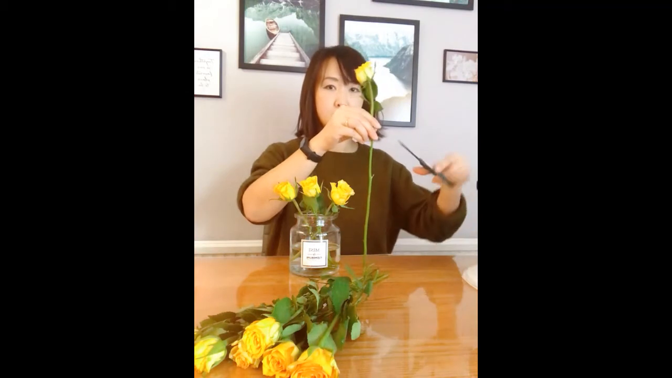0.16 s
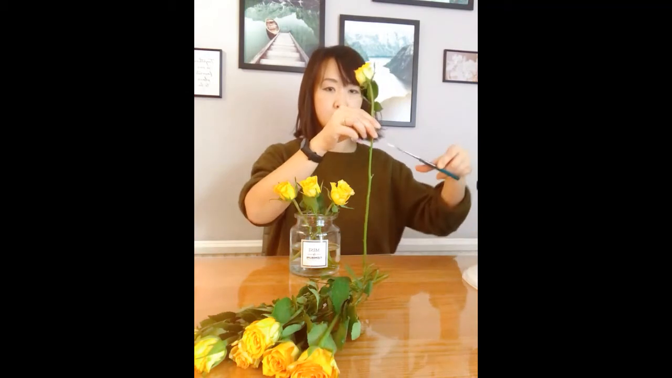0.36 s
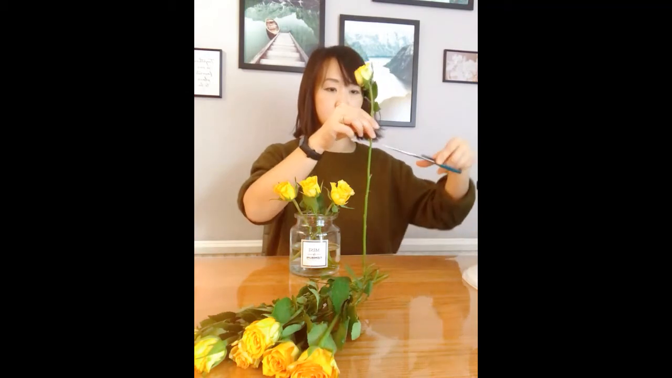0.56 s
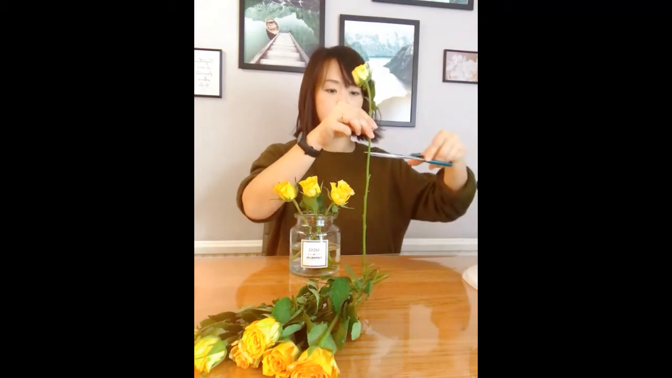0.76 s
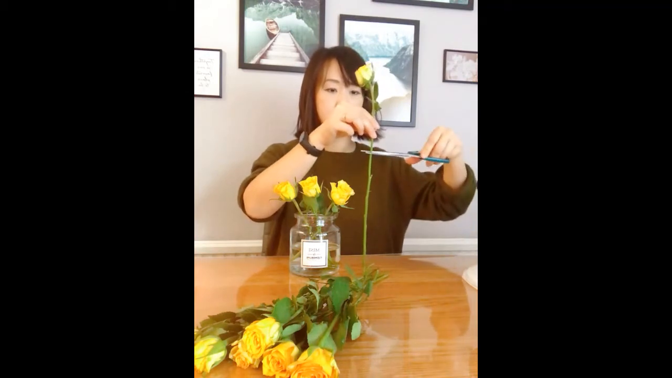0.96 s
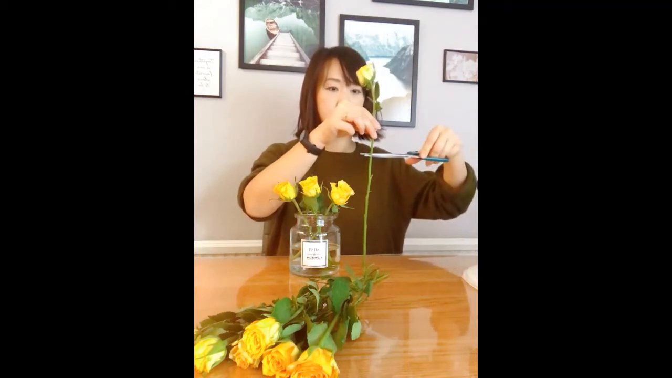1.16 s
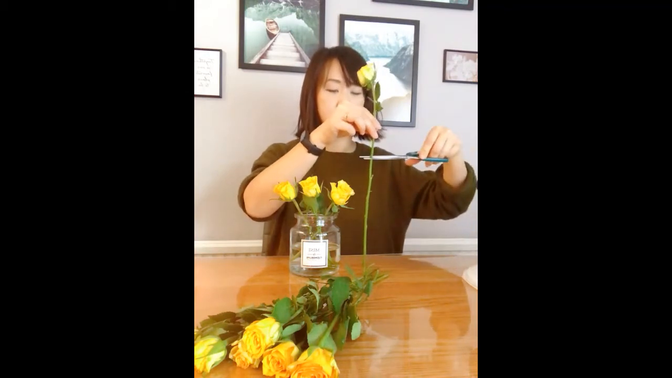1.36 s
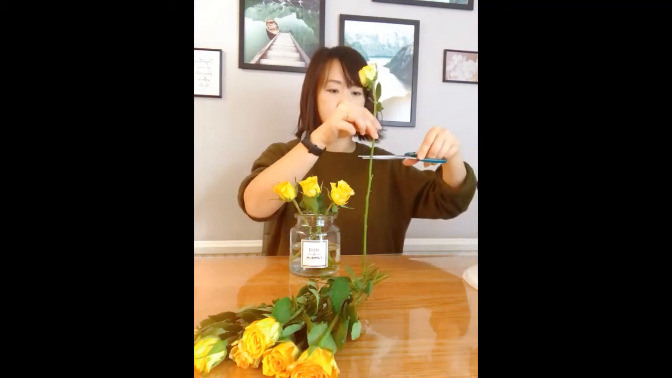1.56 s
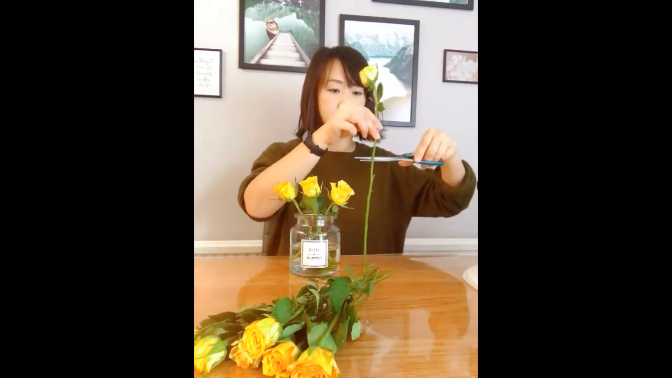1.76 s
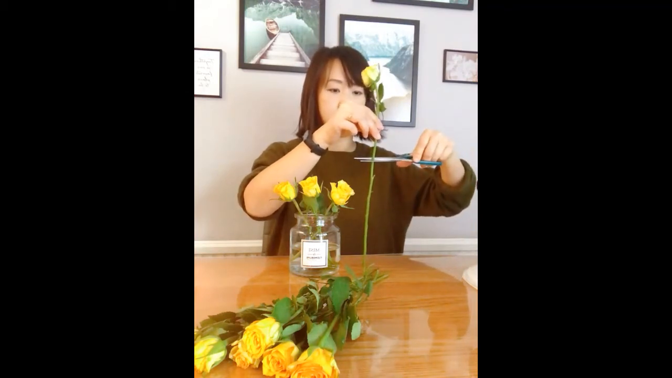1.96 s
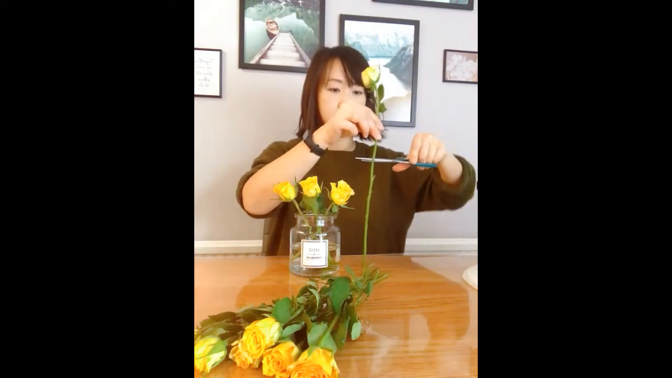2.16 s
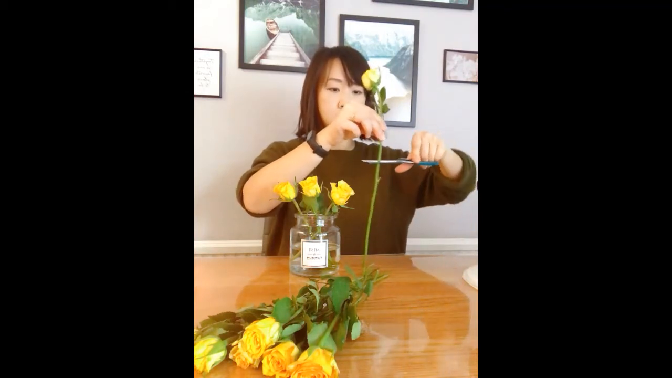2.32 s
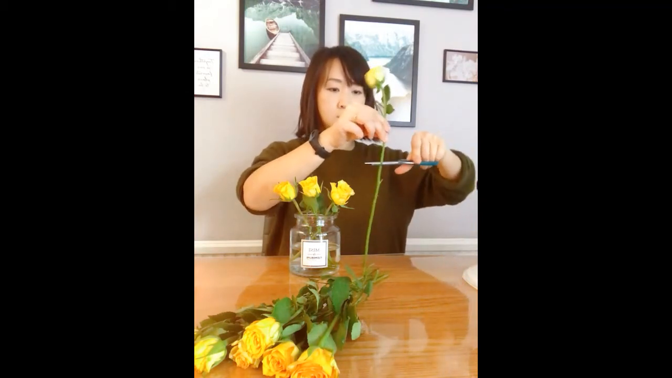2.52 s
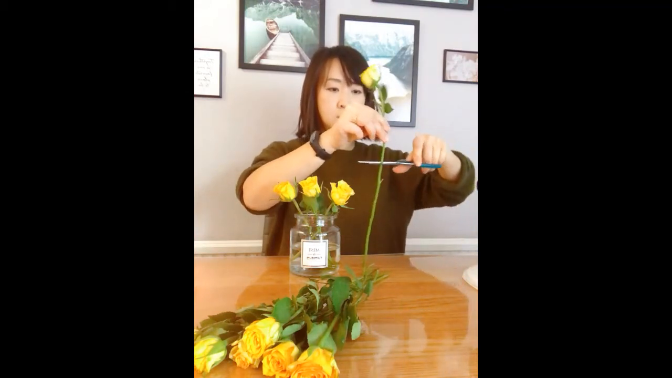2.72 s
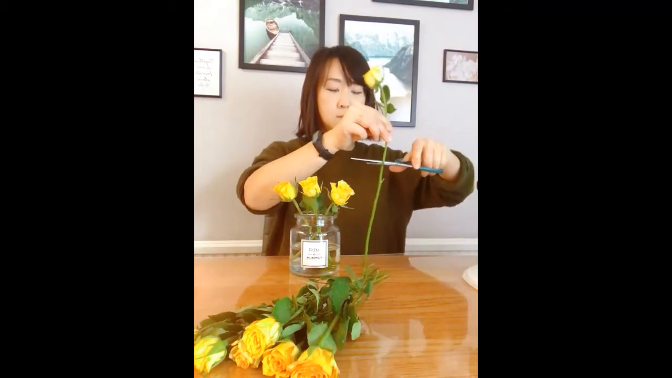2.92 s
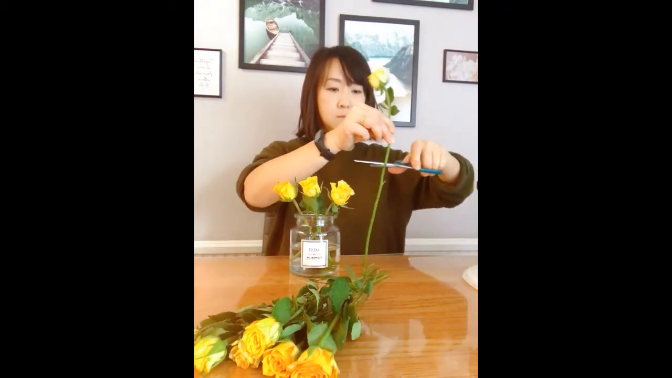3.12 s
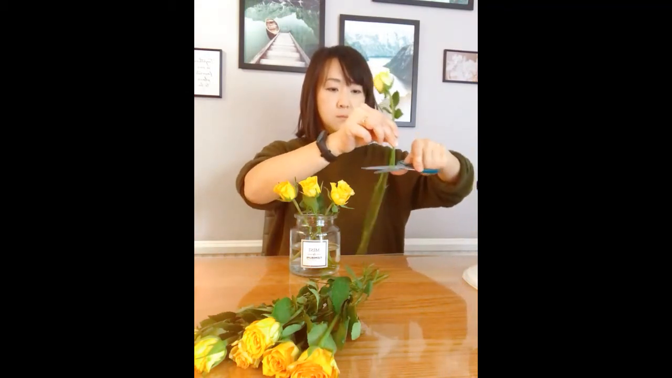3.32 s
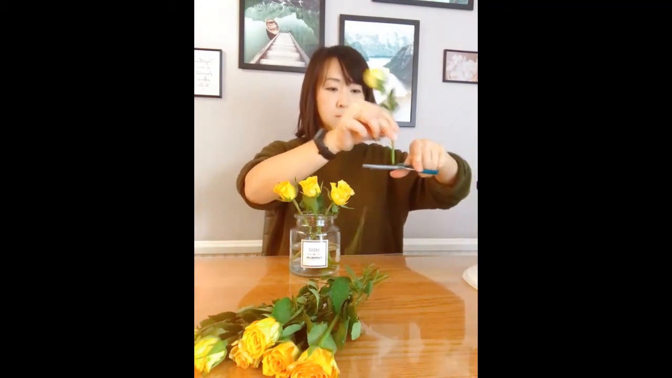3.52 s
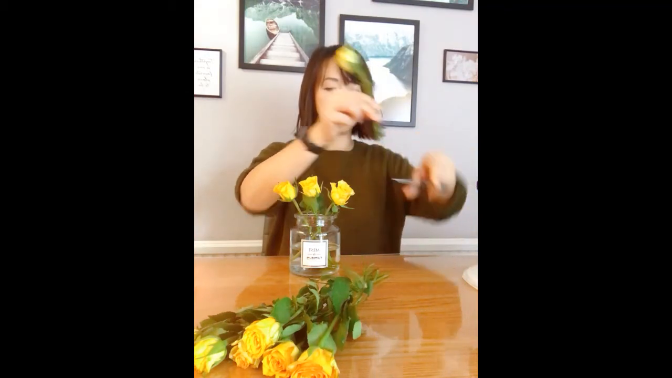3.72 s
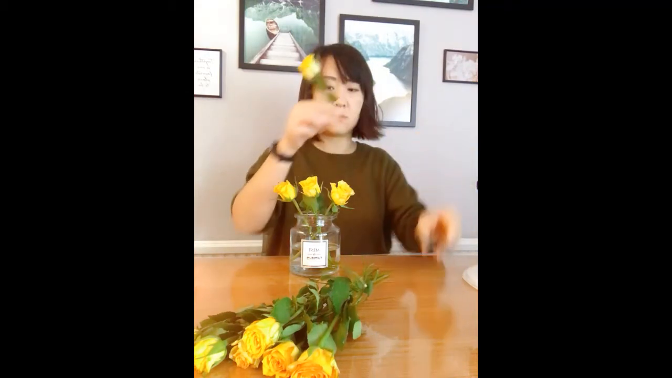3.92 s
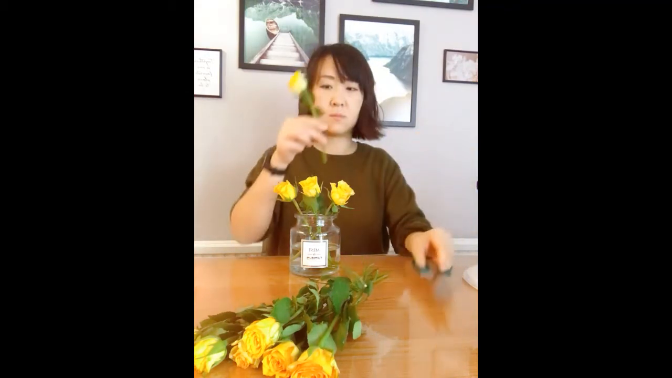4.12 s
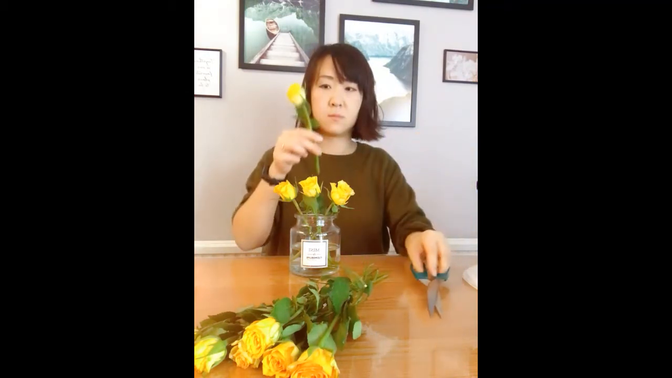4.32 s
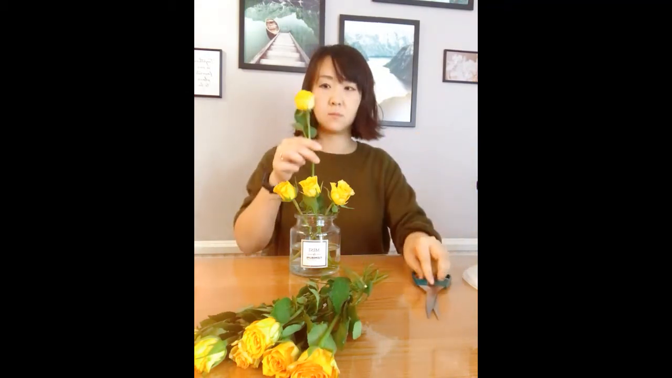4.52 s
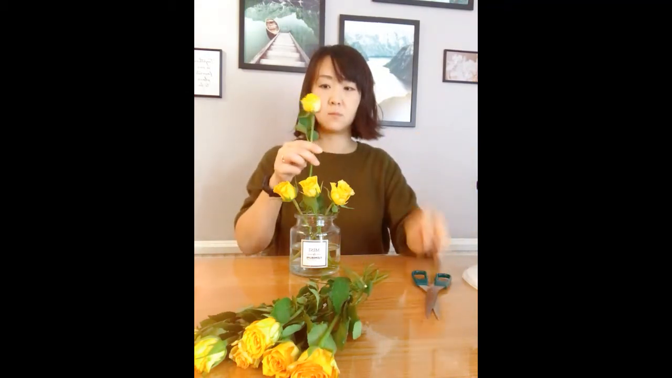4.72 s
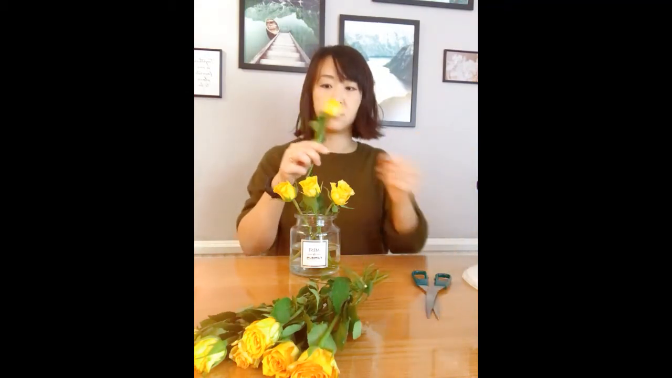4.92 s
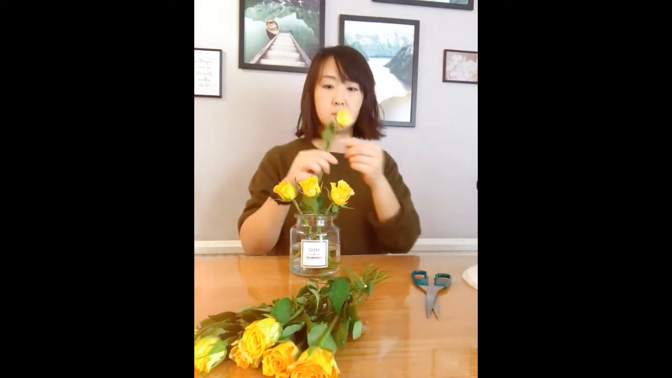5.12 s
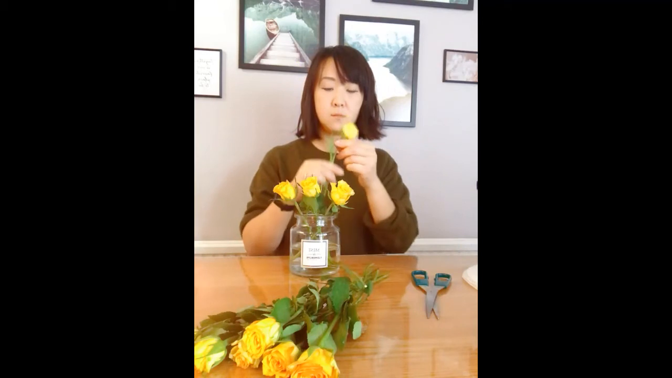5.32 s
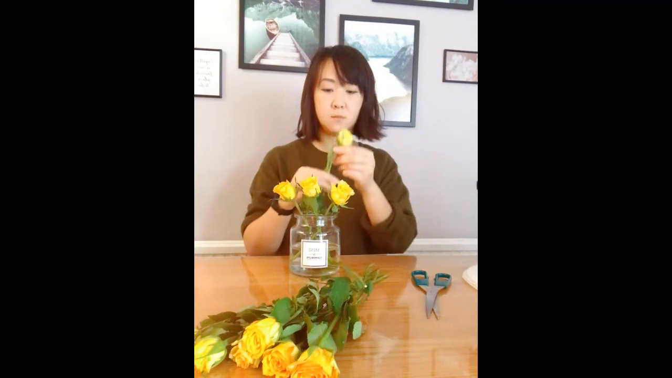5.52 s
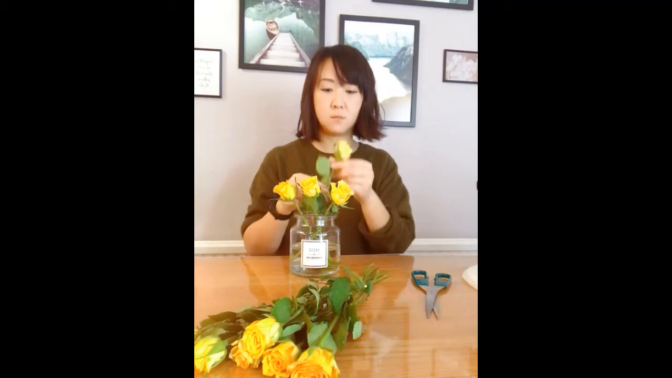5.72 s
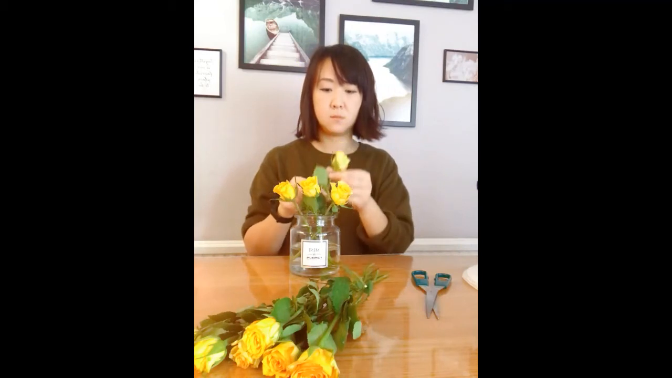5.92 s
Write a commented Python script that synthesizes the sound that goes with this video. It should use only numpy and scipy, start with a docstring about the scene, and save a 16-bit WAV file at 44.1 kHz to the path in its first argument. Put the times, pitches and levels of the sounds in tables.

```python
"""Room air, sleeves and leaves lie under a cut rose: coloured noise, the last two swelling with each movement.
Scissors scrape open on rough noise with a falling ring, and their blades catch and clack in ringing bursts.
The woody stem cracks as short decaying tones, its fibres tick apart, and the blades snap shut with a gliding squeak.
The cut end clinks on a glass jar and slaps onto a wooden table, both built from decaying modes and noise.
The scissors are laid down, tips first, then chattering handles; the stem cracks and the leaves rustle once more."""
import sys
import numpy as np
from scipy import signal
from scipy.fft import rfft, irfft, next_fast_len
from scipy.io import wavfile
from scipy.ndimage import uniform_filter1d

SR = 44100
rng = np.random.default_rng(int(sys.argv[2]) if len(sys.argv) > 2 else 0)


def generate_wav(sig):
    """Save sig (samples, or channels by samples) to the path in sys.argv[1] as 16-bit PCM at SR."""
    pcm = np.round(np.clip(np.atleast_2d(sig).T, -1, 1) * 32767).astype(np.int16)
    wavfile.write(sys.argv[1], SR, pcm)


N = 263277
TIME = np.arange(N) / SR  # seconds into the scene
AGE = np.arange(SR // 2) / SR  # seconds since a blow


def amp(db):
    """Decibels to gain."""
    return 10 ** (np.asarray(db) / 20)


def unit(x):
    """Scale a steady sound to rms 1."""
    return x / np.sqrt(np.mean(x ** 2) + 1e-20)


def sized(x):
    """Scale a click to the energy of one millisecond at full level."""
    return x / np.sqrt(np.sum(x ** 2) * 1000 / SR + 1e-20)


def along(points, hz):
    """Read a curve of (Hz, value) points on a log frequency axis."""
    point_hz, values = np.transpose(points)
    return np.interp(np.log(hz + 1), np.log(point_hz + 1), values)


def add(track, start_s, sound):
    """Mix a sound into the track from start_s."""
    room_left = track[round(start_s * SR):]
    room_left[:len(sound)] += sound[:len(room_left)]


def fade(t60_s):
    """Exponential decay after a blow, down 60 dB at t60_s."""
    return np.exp(-np.log(1000) * AGE / t60_s)


def burst(t60_s):
    """Dying white noise, the raw material of a hit."""
    return sized(rng.standard_normal(len(AGE)) * fade(t60_s))


def coloured(x, spectrum):
    """Minimum-phase filter through (Hz, dB) points, so a click keeps its sharp onset."""
    size = 2 * next_fast_len(len(x) // 2 + 4096)
    gain = amp(along(spectrum, np.fft.rfftfreq(size, 1 / SR)))
    cepstrum = irfft(np.log(gain + 1e-6))
    # folding the cepstrum onto positive time makes the filter causal
    cepstrum[1:size // 2] *= 2
    cepstrum[size // 2 + 1:] = 0
    return irfft(rfft(x, size) * np.exp(rfft(cepstrum)))[:len(x)]


def resonated(x, modes):
    """Drive parallel (Hz, width Hz, dB) resonances with x."""
    size = next_fast_len(len(x) + 4096)
    f = np.fft.rfftfreq(size, 1 / SR)
    response = sum(amp(db) * 1j * f * width / (centre ** 2 - f ** 2 + 1j * f * width)
                   for centre, width, db in modes)
    return irfft(rfft(x, size) * response, size)[:len(x)]


def ring(modes, scatter_db):
    """Free (Hz, dB, t60 s) modes, each strength varied at random by scatter_db."""
    return sum(amp(db + scatter_db * rng.normal()) * fade(t60_s) * np.sin(2 * np.pi * hz * AGE)
               for hz, db, t60_s in modes)


def grit(rough_db, rate_hz):
    """Friction: noise whose strength wavers at random, rate_hz new strengths a second."""
    noise = rng.standard_normal(N)
    knots_s = np.arange(0, N / SR, 1 / rate_hz)
    strength = np.interp(TIME, knots_s, rng.standard_normal(len(knots_s)))
    return noise * amp(rough_db * strength)


def stroke(start_s, hold_s, attack_s, release_s):
    """Envelope of one movement: full for the hold, a tenth one attack before and one release after."""
    before = np.maximum(start_s - TIME, 0) / attack_s
    after = np.maximum(TIME - start_s - hold_s, 0) / release_s
    return 10 ** -(before + after)


def swells(moves):
    """Sum the envelopes of (start_s, level_db, attack_s, release_s) moves."""
    return sum(amp(db) * stroke(start_s, 0, attack_s, release_s) for start_s, db, attack_s, release_s in moves)


def chatter(start_s, level_db, hold_s, gap_s, loss_db, jitter, count):
    """(s, dB) of an uneven run of contacts: equally strong for the hold, then each weaker than the last."""
    k = np.arange(count)
    uneven = jitter * rng.uniform(-1, 1, count) * (k > 0)  # in gaps; the first contact is on time
    times_s = start_s + gap_s * (k + uneven)
    levels_db = level_db - loss_db * np.maximum(k - abs(hold_s / gap_s), 0)
    return list(zip(times_s, levels_db))


# decay of the small room: hz, t60_s
ROOM_DECAY = [(100, 0.46), (700, 0.32), (2000, 0.29), (5000, .29), (13000, 0.18)]


def in_room(x, wet_db):
    """Add the answer of the near walls, whose treble dies first."""
    hz, t, bins = signal.stft(rng.standard_normal(len(AGE)), SR, nperseg=256)
    decay = np.exp(-np.log(1000) * t / along(ROOM_DECAY, hz)[:, None])
    tail = signal.istft(bins * decay, SR, nperseg=256)[1][:len(AGE)]
    tail *= 1 - np.exp(-(AGE / 0.0017) ** 2)  # the echoes build up over a few ms
    return x + amp(wet_db) * signal.fftconvolve(x, tail / np.linalg.norm(tail))[:N]


# colour of the still air: hz, level_db
AIR_TONE = [(12, -32.5), (20, 4.5), (86, -0.5), (146, -3), (216, -5.5), (388, -8.5), (472, -10), (574, -11),
            (780, -12.5), (1290, -16), (1570, -17), (2820, -20), (11400, -27), (14700, -31.5),
            (16000, -37.5)]
AIR_DB = -64


def room_air():
    """Still room air as steady coloured noise."""
    return amp(AIR_DB) * unit(coloured(rng.standard_normal(N), AIR_TONE))


# the arms move: start_s, level_db, attack_s, release_s
ARM_MOVES = [(0, -61, .1, .13), (.195, -62.5, .04, .08), (.4, -53.5, .11, 0.056),
             (2.475, -54.5, 0.06, .035), (3.665, -51, 0.033, 0.16)]
# colour of rubbing cloth: hz, level_db
SLEEVE_TONE = [(25, 3.5), (60, -1.5), (180, -3), (450, -15), (1000, -13), (3000, -48)]


def sleeves():
    """Moving arms rub the sleeves: dark noise that swells with each move."""
    return swells(ARM_MOVES) * unit(coloured(rng.standard_normal(N), SLEEVE_TONE))


# leaves brush the hands: start_s, level_db, attack_s, release_s
LEAF_BRUSHES = [(0, -66, .1, .11), (.26, -71.5, .3, .15), (4.32, -74.5, .3, .4), (5.655, -64.5, .05, .19),
                (5.89, -72, .08, .45)]
# colour of the rustle: hz, level_db
LEAF_TONE = [(350, -34), (600, 7), (765, -7.5), (948, -10), (1160, -4.5), (3650, -0.5), (4650, -7),
             (15000, -13)]


def leaves():
    """Leaves brush the hands: gritty friction noise that swells with each touch."""
    return swells(LEAF_BRUSHES) * unit(coloured(grit(rough_db=3.5, rate_hz=270), LEAF_TONE))


# the blades catch as they open: start_s, level_db, ring_hz, treble_db (against the ring)
BLADE_CATCHES = [(0.3793, -43.5, 2220, -12), (0.3808, -41.5, 2100, -14), (0.4047, -40.5, 2880, -18),
                 (0.4078, -32, 2720, -11.5)]
# colour of blade sliding on blade: hz, level_db
SCRAPE_TONE = [(180, -42), (300, -9.5), (1090, -7), (1420, 0), (1670, -27), (1940, -9), (2360, 5),
               (3130, -18), (3630, -7.5), (4070, -5), (4490, -12), (6250, -23), (11300, -11), (15500, -49)]
# colour of small sharp snaps, also in the cracks and the bark: hz, level_db
SPLINTER_TONE = [(200, 4), (900, 8.5), (1500, -11), (4200, -5.5), (6000, 1), (10000, 2), (13000, -8),
                 (16000, -8)]
# one stroke that eases off, its ring falling as the contact travels
SLIDE_S, SLIDE_HOLD_S, SLIDE_ATTACK_S, SLIDE_RELEASE_S, SLIDE_DB = .353, .04, .032, 0.043, -56.5
SLIDE_HZ, SLIDE_OCTAVES_PER_S = 4620, 24


def opening():
    """The blades scrape apart with a falling, fluttering ring and catch on each other."""
    ring_hz = SLIDE_HZ * 2 ** (-SLIDE_OCTAVES_PER_S * np.maximum(TIME - SLIDE_S, 0))
    scrape = unit(coloured(grit(rough_db=5, rate_hz=490), SCRAPE_TONE))
    flutter = unit(uniform_filter1d(rng.standard_normal(N), size=70))
    falling_ring = flutter * np.sin(2 * np.pi * np.cumsum(ring_hz) / SR)
    effort = amp(SLIDE_DB) * stroke(SLIDE_S, SLIDE_HOLD_S, SLIDE_ATTACK_S, SLIDE_RELEASE_S)
    out = effort * (scrape + amp(-7.5) * falling_ring)
    for start_s, level_db, catch_hz, treble_db in BLADE_CATCHES:
        band = [(catch_hz, 1900, 0)]
        snap = sized(resonated(resonated(burst(0.01), band), band))
        treble = sized(coloured(burst(0.0065), SPLINTER_TONE))
        add(out, start_s, amp(level_db) * (snap + amp(treble_db) * treble))
    return in_room(out, wet_db=-20)


# steel meets steel or the table top: start_s, level_db, ring_hz, ring_db (against the crack)
STEEL_CLACKS = [(.38, -53, 11200, 4), (2.4713, -45, 12250, 1.5), (2.994, -37, 11000, -3.5),
                (3.6521, -19, 11000, -6), (3.6526, -22, 13500, -3), (4.086, -52, 8470, -1),
                (4.4956, -36.5, 5670, .5), (4.4991, -36, 12200, 7), (4.734, -51, 4500, .5)]
# colour of the sharp crack: hz, level_db
STEEL_TONE = [(150, -8.5), (1400, -9.5), (2300, -3), (4500, -5.5), (5900, -2.5), (8200, -2), (9500, -5),
              (11300, -4), (13500, -3), (15800, -24)]


def clacks():
    """Hard contacts of steel: a sharp crack, then a narrow band of high ringing."""
    out = np.zeros(N)
    for start_s, level_db, ring_hz, ring_db in STEEL_CLACKS:
        band = [(ring_hz, 1500, 0)]
        strike = burst(0.0051) + amp(-7) * burst(0.15)
        shimmer = sized(resonated(resonated(strike, band), band))
        crack = sized(coloured(burst(.0055), STEEL_TONE))
        add(out, start_s, amp(level_db) * (crack + amp(ring_db) * shimmer))
    return in_room(out, wet_db=-18)


# the stem cracks under the blades, later under the fingers:
# start_s, level_db, splinter_db (against the wood), pitch_hz, ring_t60_s
STEM_CRACKS = [(2.3555, -57.5, 3, 2500, .005), (2.4300, -45, -22, 2900, 0.0045),
               (2.4712, -28.5, -12.5, 2500, 0.0072), (2.5066, -52, -5, 2550, .005),
               (2.578, -56, -7, 2570, .004), (2.9858, -38, -11, 2710, 0.0021),
               (2.9984, -46, -6, 2410, 0.002), (5.5075, -54.5, -12, 2900, .0043),
               (5.5512, -52, -10.5, 2450, .004)]


def cracks():
    """Each crack rings the woody stem for a few cycles, with a spit of splinters on top."""
    out = np.zeros(N)
    for start_s, level_db, splinter_db, pitch_hz, t60_s in STEM_CRACKS:
        soft_onset = 1 - fade(t60_s / 2)
        wood = sized(fade(t60_s) * np.sin(2 * np.pi * pitch_hz * AGE) * soft_onset)
        splinters = sized(coloured(burst(0.0076), SPLINTER_TONE))
        crack = amp(level_db) * (wood + amp(splinter_db) * splinters)
        add(out, start_s, crack)
        add(out, start_s + .0032, amp(-12) * crack)  # echo off the table top
    return in_room(out, wet_db=-18.5)


# the hand squeezes and the edge grinds into the stem: start_s, hold_s, grinding_db, crackle_db
HAND_SQUEEZES = [(2.362, .048, -72, -66), (2.45, .02, -72, -72), (3.388, .047, -64, -70),
                 (3.484, .02, -64, -70)]
SQUEEZE_ATTACK_S, SQUEEZE_RELEASE_S = 0.03, 0.064
# bundles of fibres part along the edge: start_s, level_db (against FIBRE_DB), tearing_s
FIBRE_BUNDLES = [(3.3742, -43, 0), (3.3826, -45, 0), (3.4293, -40.5, 0.005), (3.4674, -46, 0),
                 (3.4776, -34.5, 0), (3.486, -37.5, 0.0056), (3.4998, -36.5, 0), (3.517, -48, 0.00048),
                 (3.6296, -41, 0.0014), (3.643, -29.5, 0.0019)]
FIBRE_DB = -8  # overall level of the fibre ticks
FIBRE_GAP_S, FIBRE_LOSS_DB = .0015, 9.5  # from one fibre of a bundle to the next
# resonances of blades held against the stem: centre_hz, width_hz, level_db
BLADE_MODES = [(2407, 290, 6), (4360, 330, 0.5), (5040, 440, 1), (5750, 280, -2), (6310, 320, 4.5),
               (6820, 130, -6), (7880, 160, -4), (9600, 1230, -9.5), (12600, 2900, -10.5)]
CRACKLE_PER_S = 110


def cutting():
    """With each squeeze bark crackles and the edge grinds inward; parting fibres tick the blades."""
    grinding = unit(resonated(grit(rough_db=5, rate_hz=900), BLADE_MODES))
    specks = (rng.random(N) < CRACKLE_PER_S / SR) * rng.standard_normal(N)
    crackle = unit(coloured(signal.fftconvolve(specks, burst(.003))[:N], SPLINTER_TONE))
    out = np.zeros(N)
    for start_s, hold_s, grinding_db, crackle_db in HAND_SQUEEZES:
        squeeze = stroke(start_s, hold_s, SQUEEZE_ATTACK_S, SQUEEZE_RELEASE_S)
        out += squeeze * (amp(grinding_db) * grinding + amp(crackle_db) * crackle)
    for start_s, bundle_db, tearing_s in FIBRE_BUNDLES:
        fibres = chatter(start_s, bundle_db, tearing_s, FIBRE_GAP_S, FIBRE_LOSS_DB, jitter=.35, count=6)
        for fibre_s, fibre_db in fibres:
            tick = sized(resonated(burst(0.0025), BLADE_MODES))
            add(out, fibre_s, amp(fibre_db + FIBRE_DB) * tick)
    return in_room(out, wet_db=-18.5)


# colour of the tearing: hz, level_db
SHEAR_TONE = [(150, -16), (650, -10.5), (1400, -14), (2100, -2), (2600, -5), (3600, -10), (5000, -6),
              (6600, -5.5), (8000, -3.5), (11000, -10), (15500, -25)]
# the rest of the stem gives way in one rush of slips
RUPTURE_S, RUPTURE_HOLD_S, RUPTURE_DB = 3.6472, 0.0057, -26.5
RUPTURE_GAP_S, RUPTURE_LOSS_DB = .0016, 1.5  # from slip to slip
# the closing blades squeak, gliding up to a steady pitch
SQUEAK_S, SQUEAK_HOLD_S, SQUEAK_ATTACK_S, SQUEAK_RELEASE_S, SQUEAK_DB = 3.6575, .0055, .002, .003, -28.5
SQUEAK_FROM_HZ, SQUEAK_TO_HZ, SQUEAK_GLIDE_S = 9800, 11600, .0025
JOLT_S, JOLT_DB = 3.665, -43.5  # the shut blades jolt the hand


def snip():
    """The last fibres tear in a rush of noise bursts; the blades squeak home and jolt the hand."""
    out = np.zeros(N)
    slips = chatter(RUPTURE_S, RUPTURE_DB, RUPTURE_HOLD_S, RUPTURE_GAP_S, RUPTURE_LOSS_DB, jitter=.3, count=9)
    for slip_s, slip_db in slips:
        add(out, slip_s, amp(slip_db) * sized(coloured(burst(0.0066), SHEAR_TONE)))
    glide = np.exp(-np.maximum(TIME - SQUEAK_S, 0) / SQUEAK_GLIDE_S)
    squeak_hz = SQUEAK_TO_HZ + (SQUEAK_FROM_HZ - SQUEAK_TO_HZ) * glide
    pressure = stroke(SQUEAK_S, SQUEAK_HOLD_S, SQUEAK_ATTACK_S, SQUEAK_RELEASE_S)
    out += amp(SQUEAK_DB) * pressure * np.sin(2 * np.pi * np.cumsum(squeak_hz) / SR)
    jolt = ring([(61.6, -2, 0.11), (349, -3, 0.11)], scatter_db=0)
    add(out, JOLT_S, amp(JOLT_DB) * jolt)
    return in_room(out, wet_db=-12)


# the cut end touches the jar: start_s, level_db
JAR_CLINKS = [(3.8322, -42), (3.8368, -44.5)]
# modes of the glass: pitch_hz, level_db, t60_s
JAR_MODES = [(3730, -2, 0.034), (3908, -0.5, 0.074), (4872, -8, 0.13), (5087, -10, 0.052),
             (6379, -31, 0.27)]
# colour of the stem's blows on glass and on wood: hz, level_db
STEM_BLOW_TONE = [(88, -59), (150, -25), (265, -27), (339, -9), (477, -5), (577, -15.5), (893, -5),
                  (964, -10), (1160, -1.5), (2180, -5.5), (2540, 0), (2950, -7.5), (14000, -37.5)]


def jar():
    """The falling piece of stem brushes the glass: ringing modes under a woody tap."""
    out = np.zeros(N)
    for start_s, level_db in JAR_CLINKS:
        glass = ring(JAR_MODES, scatter_db=2)
        tap = sized(coloured(burst(.025), STEM_BLOW_TONE))
        add(out, start_s, amp(level_db) * (glass + amp(-4.5) * tap))
    return in_room(out, wet_db=-7.5)


# strong modes of the table top: pitch_hz, level_db, t60_s
TABLE_MODES = [(113, -4, 0.2), (235.2, -10.5, 0.16), (380, -7.5, 0.17), (453.5, -2.5, 0.17),
               (510, -1.5, 0.14), (830, -13, 0.13), (1113, 0.5, 0.088), (1173, -3, 0.14),
               (1600, -0.5, 0.15), (1780, -7, .18), (2016, -1.5, 0.17), (2930, -3, 0.12)]


def table(blows, tone, contact_t60_s, body_t60_s, body_db, modes_db, wet_db):
    """Blows on wood: the contact, a dense wash of panel modes and a few strong ones."""
    out = np.zeros(N)
    for start_s, level_db in blows:
        modes = sized(ring(TABLE_MODES, scatter_db=2))
        wood = burst(contact_t60_s) + amp(body_db) * burst(body_t60_s) + amp(modes_db) * modes
        add(out, start_s, amp(level_db) * sized(coloured(wood, tone)))
    return in_room(out, wet_db)


# the cut end slaps down along its length, rattles and bounces ever lower
LANDING_S, LANDING_DB = 3.888, -26.5
SLAP_GAP_S, SLAP_GROWTH_DB = .003, 7  # contacts that build up to the landing
RATTLE_GAP_S, RATTLE_LOSS_DB = .008, 6  # contacts that follow it
FLIGHT_S, FLIGHT_SHRINK, BOUNCE_LOSS_DB = .0512, .37, 11.5  # first flight, next over last, loss per bounce


def stem_fall():
    """The cut end slaps onto the table, rattles and bounces twice."""
    # a negative gap runs back in time, so the slap grows into the landing
    slap = chatter(LANDING_S, LANDING_DB, 0, -SLAP_GAP_S, SLAP_GROWTH_DB, jitter=0.096, count=4)
    rattle = chatter(LANDING_S, LANDING_DB, 0, RATTLE_GAP_S, RATTLE_LOSS_DB, jitter=.2, count=4)
    rattle = rattle[1:]  # the landing itself is already in the slap
    bounces_s = LANDING_S + np.cumsum(FLIGHT_S * FLIGHT_SHRINK ** np.arange(2))
    bounces = [(s, LANDING_DB - BOUNCE_LOSS_DB * k) for k, s in enumerate(bounces_s, 1)]
    return table(slap + rattle + bounces, STEM_BLOW_TONE, contact_t60_s=0.0054, body_t60_s=0.071,
                 body_db=-9.0, modes_db=-22.5, wet_db=-6.5)


# the blade tips touch the table, then a handle ticks it lightly: start_s, level_db (against TIP_DB)
TIP_TOUCHES = [(4.4957, -32.5), (4.4995, -32.5), (4.734, -52)]
TIP_DB = 2.5  # overall level of the touches
# colour of these touches on wood: hz, level_db
TIP_BLOW_TONE = [(25, -6.5), (45, -0.5), (75, -16), (110, -5), (200, -9.5), (300, -11.5), (460, -5),
                 (770, -23), (1170, -10.5), (1450, -23.5), (1750, -9.5), (2100, -21), (3600, -16),
                 (10000, -33), (14000, -63)]


def tips():
    """The blade tips touch down, then a handle ticks lightly: short contacts, strong wash of panel modes."""
    touches = table(TIP_TOUCHES, TIP_BLOW_TONE, contact_t60_s=0.0041, body_t60_s=0.16,
                    body_db=5.0, modes_db=-4.5, wet_db=-5)
    return amp(TIP_DB) * touches


# the handles drop and rebound, chattering each time: start_s, level_db, chatter_s
HANDLE_DROPS = [(4.8206, -27.5, .016), (4.863, -38, 0.00029)]
CHATTER_GAP_S, CHATTER_LOSS_DB = .0054, 9.5  # from contact to contact
# colour of a handle on wood: hz, level_db
HANDLE_BLOW_TONE = [(50, -35), (112, -15), (150, -26), (230, -6.5), (320, -11), (500, -6), (800, -11),
                    (1300, -17), (1800, -13.5), (2400, -21), (2900, -19), (4800, -33), (12000, -54),
                    (16000, -83)]
# hollow note of handles on wood: pitch_hz, level_db (against the drop)
THUMP_MODES = [(495, -2.5), (232, -14), (113, -21)]
THUMP_LAG_S, THUMP_ATTACK_S, THUMP_RELEASE_S = .003, .003, .012


def handles():
    """The plastic handles chatter on the table and keep up a hollow thump for as long as they do."""
    blows = []
    drive = np.zeros(N)
    for start_s, level_db, hold_s in HANDLE_DROPS:
        blows += chatter(start_s, level_db, hold_s, CHATTER_GAP_S, CHATTER_LOSS_DB, jitter=.12, count=6)
        drive += amp(level_db) * stroke(start_s + THUMP_LAG_S, hold_s, THUMP_ATTACK_S, THUMP_RELEASE_S)
    hollow = sum(amp(db) * np.sin(2 * np.pi * (hz * TIME + rng.random())) for hz, db in THUMP_MODES)
    wood = table(blows, HANDLE_BLOW_TONE, contact_t60_s=0.014, body_t60_s=0.11,
                 body_db=-6, modes_db=-15.5, wet_db=-6.0)
    return in_room(drive * hollow, wet_db=-9.5) + wood


def scene():
    """One cut, the falling stem, and the scissors put away."""
    tips_down = tips()
    cut = opening() + cracks() + cutting() + snip() + clacks()
    fall = jar() + stem_fall()
    laid_down = tips_down + handles()
    background = room_air() + sleeves() + leaves()
    return (background + cut + fall + laid_down)[None]


TOP_HZ = 16000


def record(dry):
    """Band limit: nothing from TOP_HZ up is kept."""
    size = next_fast_len(N + SR // 2)
    kept = np.fft.rfftfreq(size, 1 / SR) < TOP_HZ
    return irfft(rfft(dry, size) * kept, size)[..., :N]


dry = scene()
out = record(dry)
generate_wav(out)
```